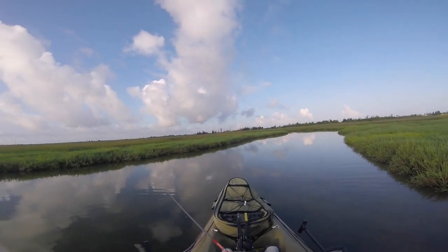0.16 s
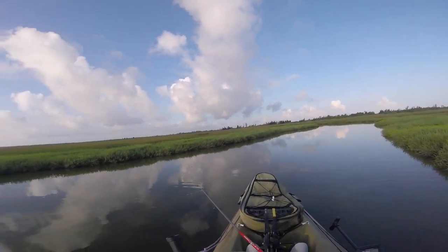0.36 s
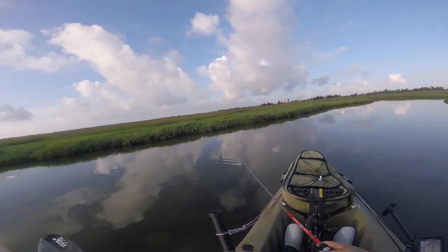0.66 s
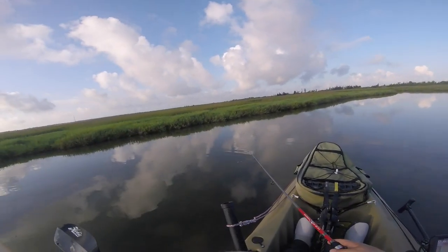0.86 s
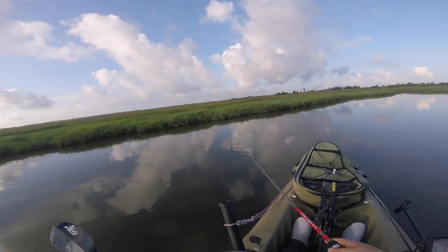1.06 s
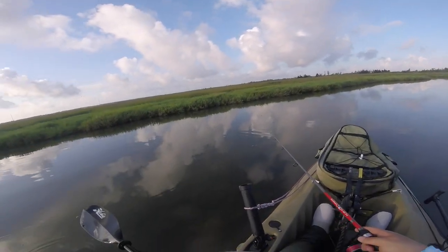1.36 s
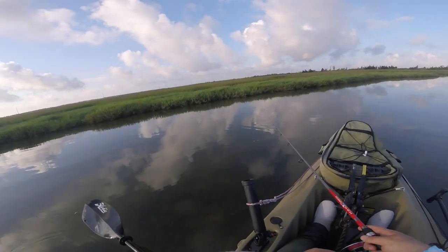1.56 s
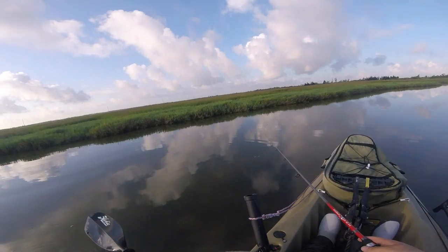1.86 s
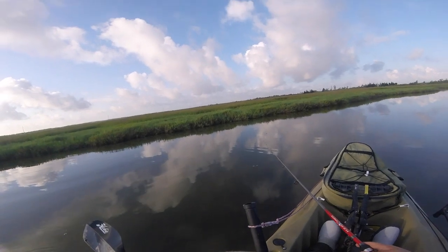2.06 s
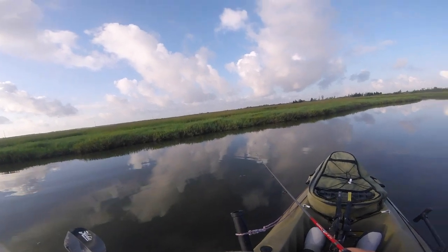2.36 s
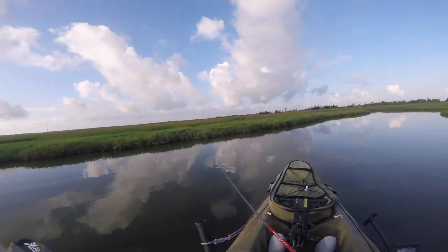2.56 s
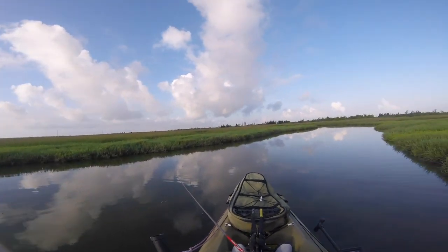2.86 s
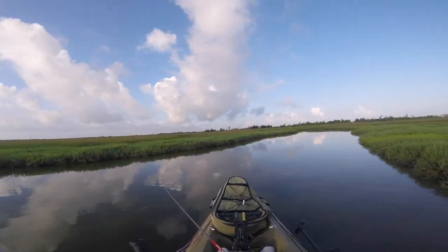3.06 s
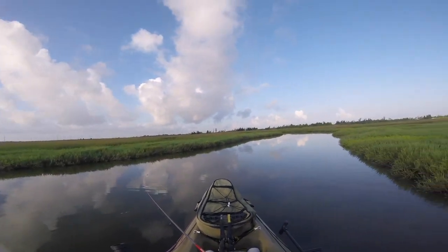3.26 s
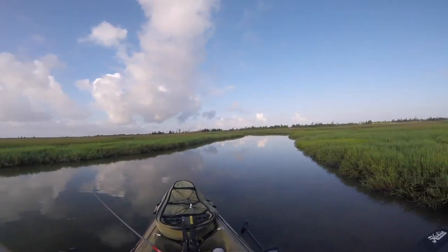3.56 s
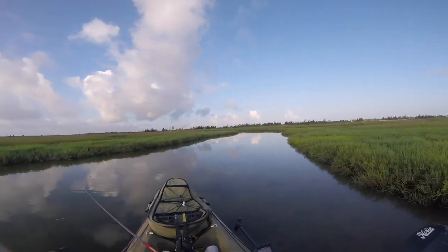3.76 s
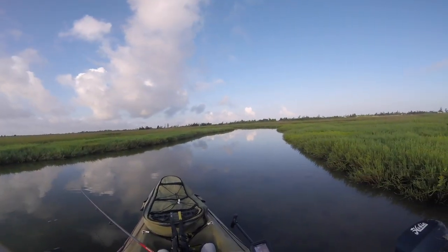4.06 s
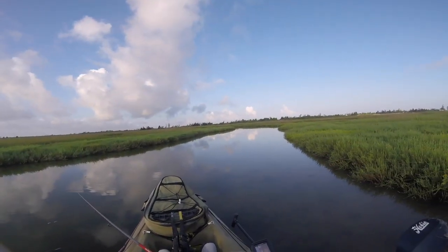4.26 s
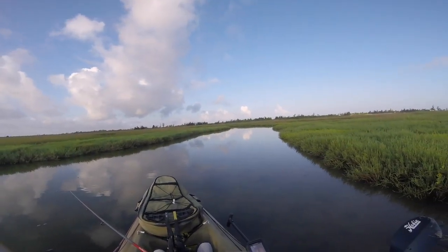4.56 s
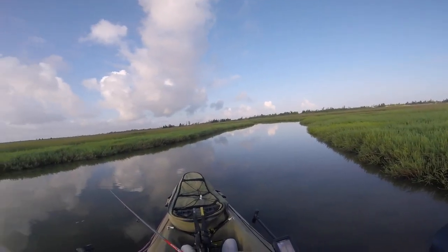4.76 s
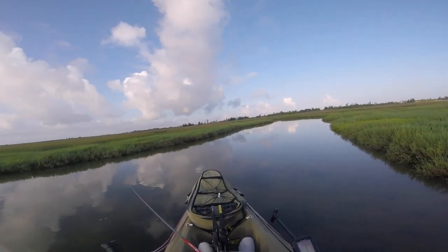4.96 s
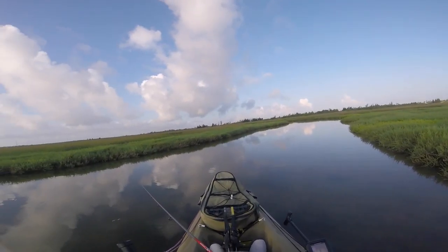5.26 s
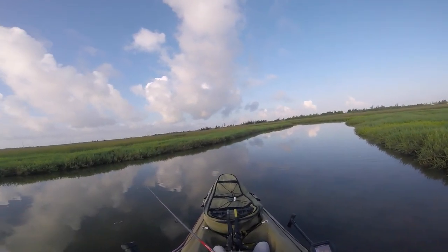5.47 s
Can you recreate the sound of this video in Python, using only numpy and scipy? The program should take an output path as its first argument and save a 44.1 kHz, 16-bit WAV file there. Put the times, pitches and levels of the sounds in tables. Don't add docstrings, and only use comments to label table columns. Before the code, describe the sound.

A dense insect chorus trills continuously from marsh grass, high and raspy, above a soft low rumble of air and far engines. A sharp tackle snap comes early and a louder one late, each briefly ducking the background. A tiny bird chip comes just before the second. Open, calm creek, heard through a hissy mono action camera microphone on a kayak.

```python
import sys
import numpy as np
from scipy import signal
from scipy.fft import rfft, irfft
from scipy.io import wavfile
from scipy.ndimage import uniform_filter1d

SR = 44100
rng = np.random.default_rng(int(sys.argv[2]) if len(sys.argv) > 2 else 0)


def transcribe(signal):
    frames = np.atleast_2d(signal).T
    limited = np.clip(frames, -1, 1)
    pcm = np.round(limited * 32767).astype(np.int16)
    wavfile.write(sys.argv[1], SR, pcm)


def how_loud(loudness_db):
    steps = np.asarray(loudness_db, float) / 20
    return 10 ** steps


N = 248283


def shaped_noise(points):
    hz, db = np.transpose(points)
    bin_hz = np.maximum(np.arange(N // 2 + 1) * SR / N, 1)
    colour_db = np.interp(np.log(bin_hz), np.log(hz), db, left=-90, right=-90)
    noise = irfft(rfft(rng.standard_normal(N)) * how_loud(colour_db), N)
    return noise / noise.std()


def walk(rate):
    hold = int(SR / rate)
    levels = np.repeat(rng.standard_normal(N // hold + 1), hold)
    return 1.29 * uniform_filter1d(uniform_filter1d(levels, hold), hold)[:N]


def ring(x, hz, t60):
    pole = np.exp(2j * np.pi * hz / SR - np.log(1000) / (t60 * SR))
    return signal.lfilter([0, pole.imag], [1, -2 * pole.real, abs(pole) ** 2], x)


# frequency in Hz, density in dB per Hz.
AIR_COLOUR = [(12, -22), (22, -3), (35, -3), (55, -6), (71, -7), (92, -4), (140, -9), (200, -12),
              (282, -18), (374, -24), (889, -28.5), (2440, -35), (4200, -43.5), (5600, -54.5)]


def air():
    return how_loud(-29 + 0.62 * walk(5.85)) * shaped_noise(AIR_COLOUR)


def engine():
    hz = 45.65 * (1 + 0.1604 * walk(12))
    level = how_loud(-33 + 0.76 * walk(3)) * 1.4
    return level * np.sin(2 * np.pi * np.cumsum(hz) / SR)


# nearest point in seconds, level in dB, half-length in seconds.
VEHICLES = [
    (1.8, -47.5, 0.79),
    (4.797, -54, 0.32),
]


def tyres():
    t = np.arange(N) / SR
    gain = how_loud(-57.5) * np.clip(t / .5, .2, 1)
    for nearest, db, half_s in VEHICLES:
        gain = gain + how_loud(db) / (1 + ((t - nearest) / half_s) ** 2)
    road = ring(rng.standard_normal(N), 996, 0.0089)
    return gain * road / road.std()


# frequency in Hz, density in dB per Hz.
HISS_COLOUR = [(3600, -44), (4600, -12.5), (5500, -7), (6000, -4.5), (7600, 0.5), (9000, -2.5),
               (10400, -9.5), (12000, -6.5), (14500, -12)]


def hiss():
    return how_loud(-45.5 + 0.59 * walk(9)) * shaped_noise(HISS_COLOUR)


def bird():
    start_s, length_s, leap_s = 4.0488, .0095, .0012
    top_hz, sag_hz, leap_hz = 3950, 650, 1000
    level_db, swell_db, fade_db_per_s = -37.5, 7, 6000
    since = np.arange(N) / SR - start_s
    done = np.clip(since / length_s, 0, 1)
    hz = top_hz - sag_hz * done ** 2 - leap_hz * np.exp(-np.maximum(since, 0) / leap_s)
    db = level_db - swell_db * (1 - done) - fade_db_per_s * np.maximum(since - length_s, 0)
    level = np.clip(since / leap_s, 0, 1) * how_loud(np.maximum(db, -200))
    chip = level * np.sin(2 * np.pi * np.cumsum(hz) / SR)
    return chip + how_loud(-11) * np.roll(chip, int(.0055 * SR))


# start in seconds, peak in dB, duck of the gain in dB, crack in dB, ring in Hz.
SNAP_EVENTS = [
    (0.70505, -9.5, 9, -39, 2680),
    (4.391, -7.8, 11, -32, 2850),
]
# frequency in Hz, level in dB, t60 in seconds.
LATCH_MODES = [
    (3350, -1, .008),
    (2500, -12, 0.008),
    (1610, 5, 0.0035),
]
# frequency in Hz, level in dB, t60 in seconds.
CRACK_MODES = [(4160, 12.5, 0.0027), (6050, 9.5, .007), (7900, 1, .004), (9500, 0, 0.0039),
               (12400, -17, .002), (15200, -16, .002)]
# delay in seconds, level in dB.
HULL_BOUNCES = [
    (.0017, -12),
    (.0044, -21),
    (.0085, -27),
    (0.0112, -25),
    (0.015, -30),
]


def snaps():
    out, size = np.zeros(N), 2048
    push = np.zeros(size)
    push[:3] = 1, 0, -1
    for start, peak_db, _, crack_db, ring_hz in SNAP_EVENTS:
        tick = ring(ring(push, ring_hz, .0016), 3080, 0.0015)
        latch = sum(how_loud(db) * ring(push, hz, t60) for hz, db, t60 in LATCH_MODES)
        tick = tick / np.abs(tick).max() + 0.16 * latch
        crack = sum(how_loud(db) * ring(push, hz, t60) for hz, db, t60 in CRACK_MODES)
        hit = tick - how_loud(crack_db + 5.0) * crack
        luck = rng.standard_normal((len(HULL_BOUNCES), 2))
        for (delay, db), (late, loud) in zip(HULL_BOUNCES, luck):
            k = int(delay * SR * (1 + 0.025 * late))
            hit[k:] += how_loud(db + 0.64 * loud) * tick[:-k]
        rattle = rng.standard_normal(size) * np.exp(-np.arange(size) / SR / 0.014)
        rattle = ring(ring(rattle, 2700, 0.0018), 2700, 0.0018)
        hit = hit / np.abs(hit).max() + how_loud(-31) * rattle / np.abs(rattle).max()
        i = int((start + 0.00058) * SR)
        out[i:i + size] += how_loud(peak_db + 3) * hit
    return out


# wing pitch in Hz, spread in Hz, ring width in Hz, strokes per second, level in dB.
SINGERS = [
    (6495, 95, 174, 66, -33),
    (6767, 122, 223, 70, -34.5),
    (7000, 97, 194, 67, -37.5),
    (6043, 115, 190, 32, -50),
]
# time in seconds, level in dB.
CHORUS_EFFORT = [(0, 1), (.45, 0), (.8, -1.3), (1.6, -0.4), (2.6, 0), (3.3, 1), (4.4, 0.6), (4.9, 0),
                 (5.63, 0.6)]


def insects(count=9):
    out = np.zeros(N)
    for group_hz, spread_hz, width_hz, rate, db in SINGERS:
        group = 0
        t60 = np.log(1000) / (np.pi * width_hz)
        sizes = np.linspace(-1.5, 1.5, num=count)
        for size, (pitch, tempo, start, near) in zip(sizes, rng.standard_normal((count, 4))):
            phase = np.cumsum(rate * (1 + .025 * tempo) / SR * np.ones(N)) + 9 * start
            stroke = (.5 + .5 * np.cos(2 * np.pi * phase)) ** 0.84
            teeth = stroke * rng.standard_normal(N)
            wing_hz = group_hz + spread_hz * (size + .1 * pitch)
            group = group + how_loud(1.5 * near) * ring(ring(teeth, wing_hz, t60), wing_hz, t60)
        out += how_loud(db + 1.07 * walk(9)) * group / group.std()
    effort_db = np.interp(np.arange(N) / SR, *np.transpose(CHORUS_EFFORT))
    return how_loud(effort_db) * out


def thinned(x):
    edge_hz, edge_step_hz, faint_db = 13100, 240, -7.2
    f, t, z = signal.stft(x, SR, "cosine", nperseg=2048, noverlap=1024)
    wander = uniform_filter1d(rng.standard_normal(len(t)), size=2)
    edge = edge_hz + edge_step_hz * np.round(wander * 1.5 + 1.5 * (t < .7))
    patch = uniform_filter1d(uniform_filter1d(np.abs(z) ** 2, size=5, axis=0), size=2, axis=1)
    usual = np.median(patch[f < edge_hz], axis=0)
    ahead = sum(np.abs(t - s + .015) < .012 for s, *_ in SNAP_EVENTS)
    keep = (f[:, None] < edge) & (patch > usual * how_loud(2 * faint_db + 10 * ahead))
    return signal.istft(z * keep, SR, "cosine", nperseg=2048, noverlap=1024)[1][:N]


def gain_control():
    attack_s, hold_s, recover_s = 0.0011, 0.04, 0.35
    t = np.arange(N) / SR
    duck_db = 0
    for start, _, depth_db, *_ in SNAP_EVENTS:
        since = np.maximum(t - start, 0)
        drop = 1 - np.exp(-since / attack_s)
        recovery = np.exp(-np.maximum(since - hold_s, 0) / recover_s)
        duck_db = duck_db + depth_db * drop * recovery
    return how_loud(-duck_db)


def scene():
    marsh = air() + engine() + tyres() + hiss() + bird() + insects()
    return np.tile(gain_control() * thinned(marsh) + snaps(), (2, 1))


# centre in seconds, length in seconds, low edge in Hz, high edge in Hz, level in dB.
SIDE_BURSTS = [
    (2.2, .04, 5700, 7000, -31),
    (2.225, .04, 7500, 9000, -52),
    (4.76, .04, 6900, 7700, -49),
]


def side_noise():
    t, side = np.arange(N) / SR, 0
    for centre, length, low_hz, high_hz, db in SIDE_BURSTS:
        swell = np.cos(np.pi * np.clip((t - centre) / length, -.5, .5))
        side = side + how_loud(db) * swell * shaped_noise([(low_hz, 0), (high_hz, 0)])
    return side


def top_cut(x):
    return signal.sosfilt(signal.butter(12, 15900, fs=SR, output="sos"), x)


def record(dry):
    mix = dry + side_noise() * np.array([[1], [-1]])
    return top_cut(mix)


dry = scene()
out = record(dry)
transcribe(out)
```